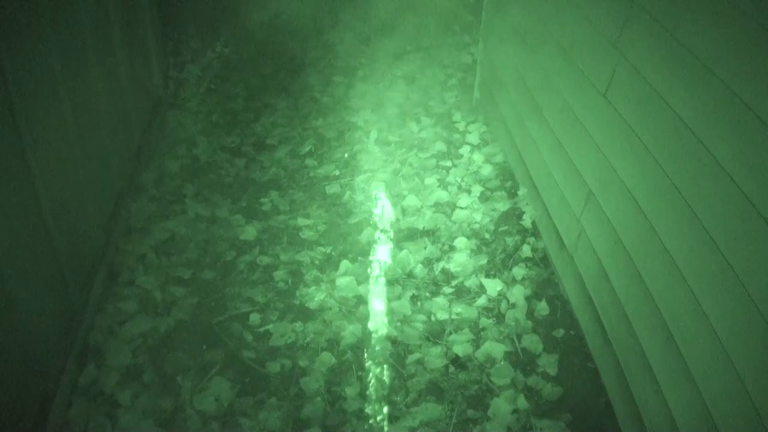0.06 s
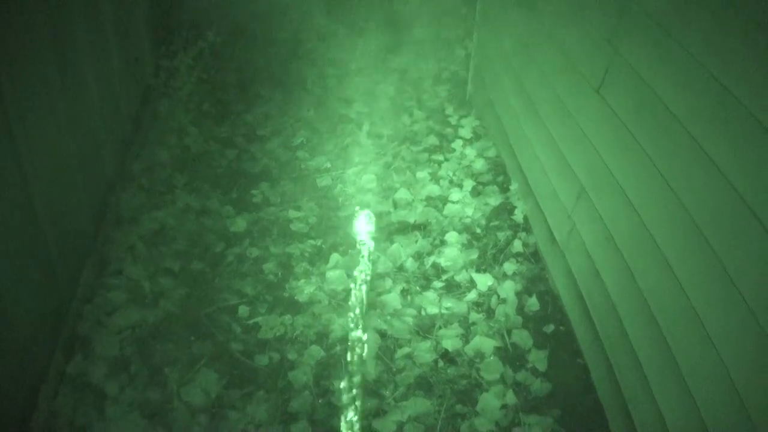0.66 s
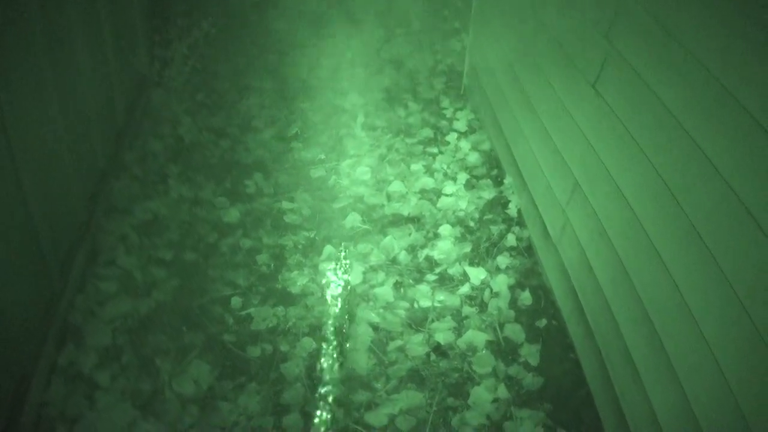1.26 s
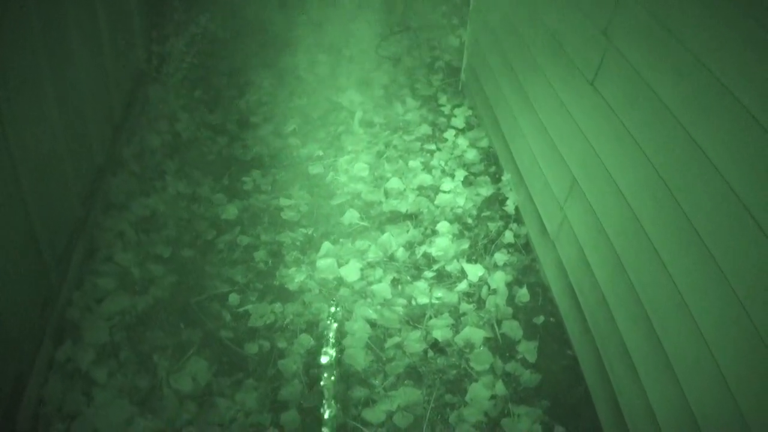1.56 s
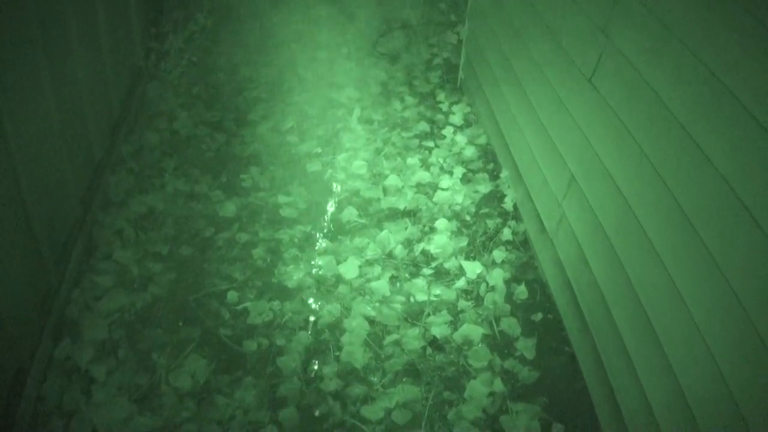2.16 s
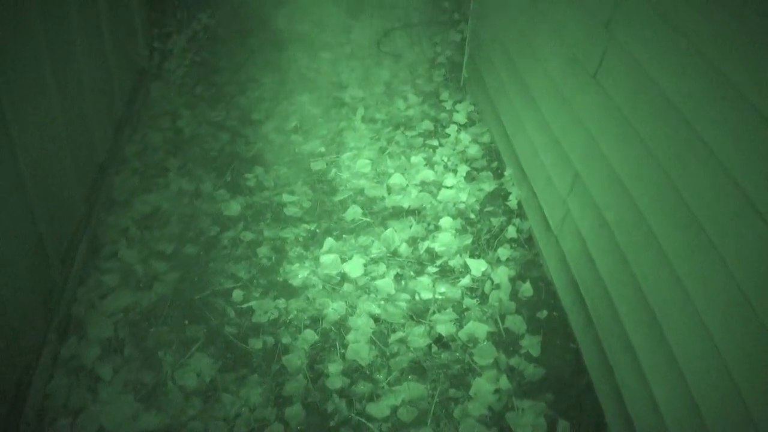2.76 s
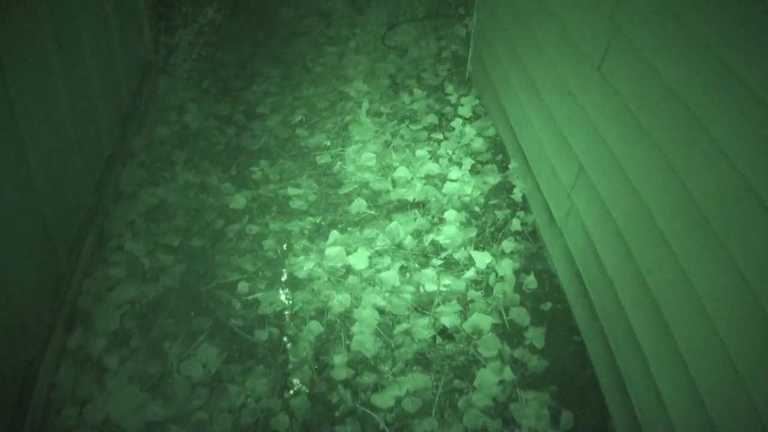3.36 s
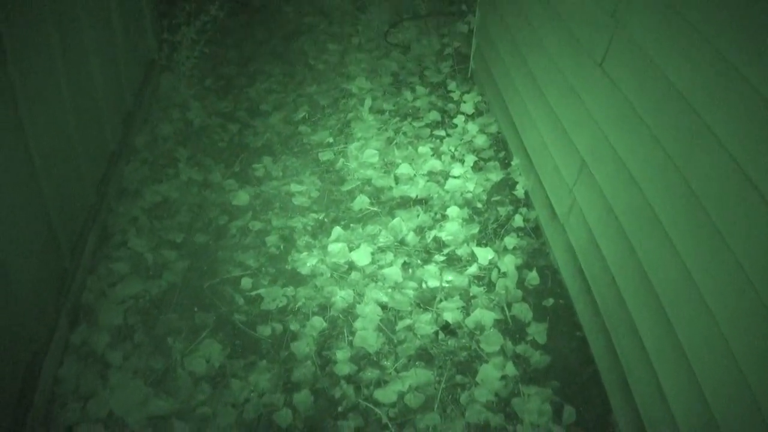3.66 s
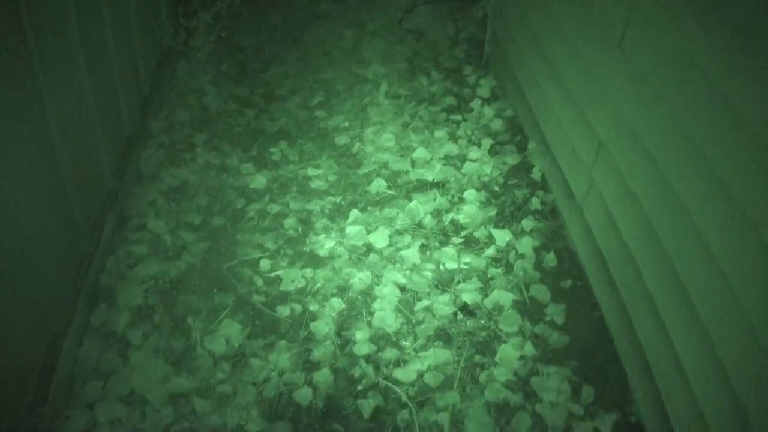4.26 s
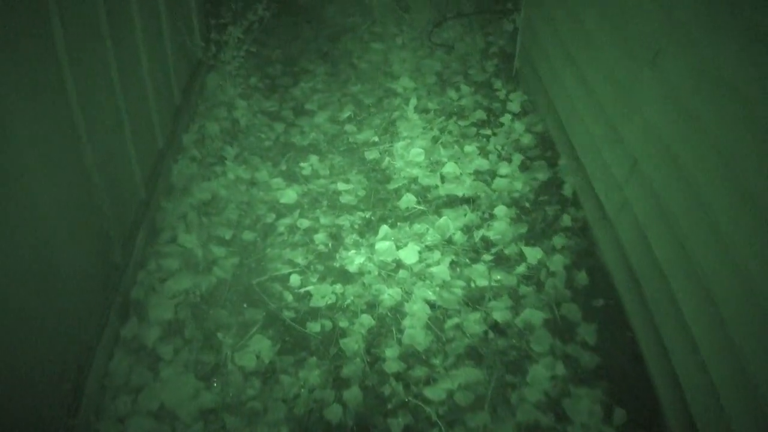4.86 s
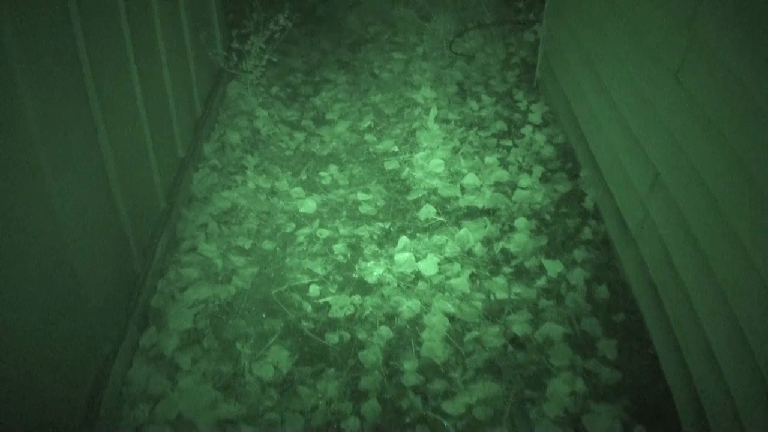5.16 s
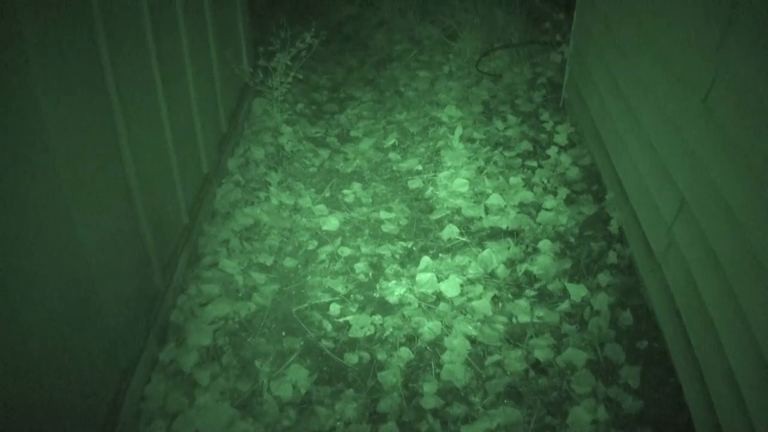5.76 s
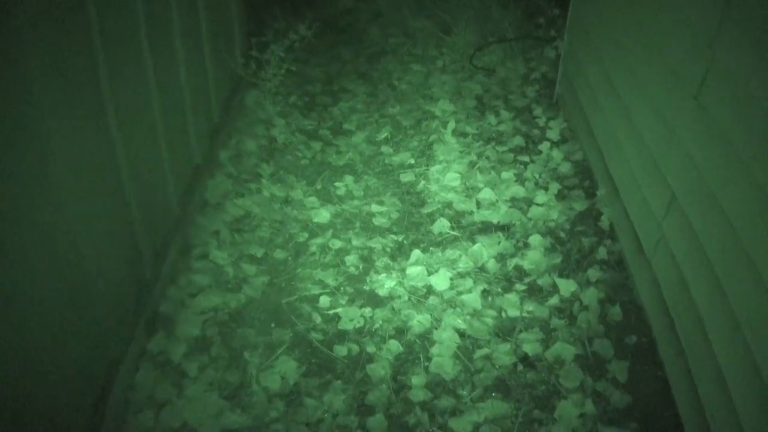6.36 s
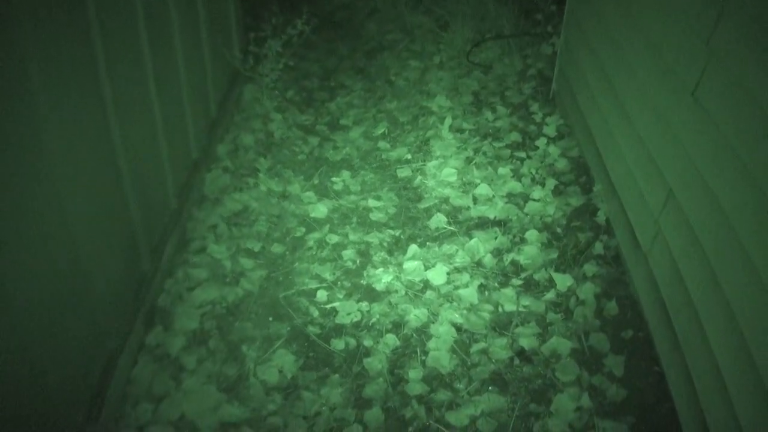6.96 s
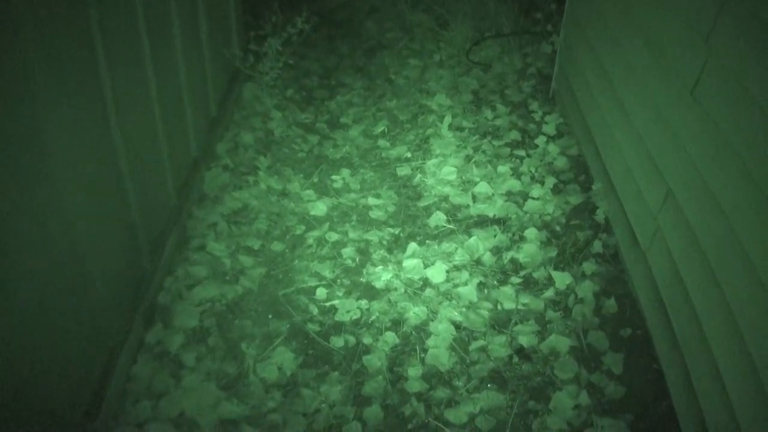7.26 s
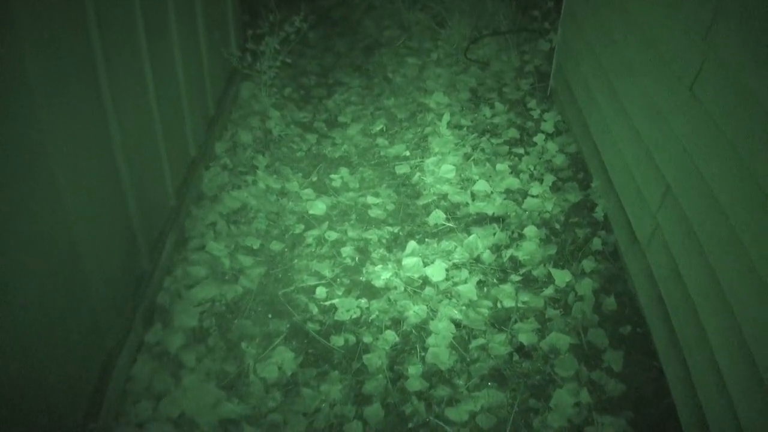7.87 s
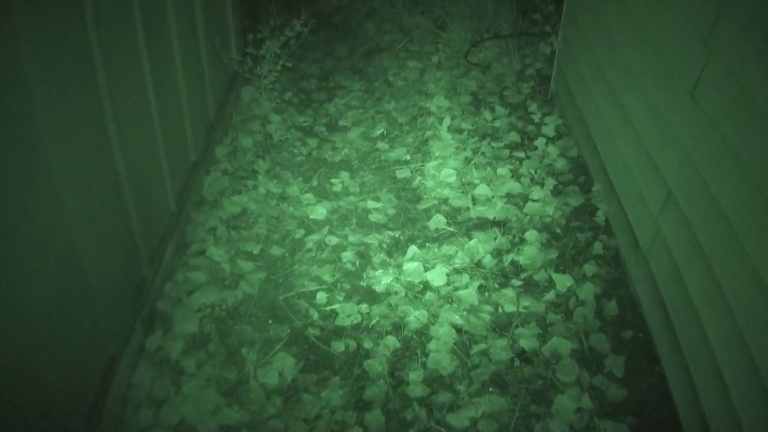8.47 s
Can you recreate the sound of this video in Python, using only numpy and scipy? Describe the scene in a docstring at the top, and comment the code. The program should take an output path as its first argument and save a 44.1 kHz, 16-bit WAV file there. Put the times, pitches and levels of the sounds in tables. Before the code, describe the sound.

Someone urinates on leaves outdoors, the splashing ending in a few drips while a camera's motor buzzes softly.

```python
"""Urine on leaves at night.

A stream patters on leaves in a narrow outdoor passage between two walls: big drops ring the leaves,
small ones merge into patter. It thins and stops; two last spurts and a few drips follow.
Throughout, a camera's tape drive buzzes into its microphone, changing colour as the camera tilts.
Behind it: hiss, a faint flickering tone and a few soft shuffles."""
import sys
import numpy as np
from scipy import signal
from scipy.fft import rfft, irfft
from scipy.io import wavfile

SR = 44100
rng = np.random.default_rng(int(sys.argv[2]) if len(sys.argv) > 2 else 0)


def master_out(mix):
    """Clip the mix to full scale and print it as 16-bit PCM to the path in sys.argv[1]."""
    frames = np.transpose(np.atleast_2d(mix))
    ceiling = np.clip(frames, -1, 1)
    pcm = np.round(ceiling * 32767).astype(np.int16)
    wavfile.write(sys.argv[1], SR, pcm)


N = 376173
TIME_S = np.arange(N) / SR

# Night air and microphone hiss: (frequency [Hz], density [dB/Hz])
HISS_SPECTRUM = [(25, -100), (55, -84), (90, -88.5), (165, -86), (250, -94), (340, -89.5), (490, -94),
                 (850, -88), (1700, -99), (3400, -100), (4000, -100.5), (4400, -105), (5200, -101.5),
                 (7500, -103), (10500, -109), (12500, -103), (15800, -114)]
# Soft low shuffles: (time [s], hold [s], level [dB])
SHUFFLE_EVENTS = [(2.865, 0.008, -50.5), (2.92, 0.093, -56), (3.55, 0.53, -62.5)]
# Shuffle colour: (frequency [Hz], relative density [dB])
SHUFFLE_SPECTRUM = [(120, -13), (220, -10), (300, 3), (400, 0), (520, -1), (750, -8), (1300, -11),
                    (2500, -26)]
# Swells of the faint tone: (time [s], hold [s], level [dB])
TONE_SWELLS = [(2.79, 0.035, -58), (2.9, 0.041, -57.5), (3.78, 0.075, -61)]
# Camera tilt: (time [s], angle index [1-3])
CAMERA_TILT = [(0, 1), (3.7, 1), (4.25, 2), (4.85, 2), (5.5, 3), (8.53, 3)]
# Tape drive, even harmonics: (frequency [Hz], relative level at angle 1, 2, 3 [dB])
EVEN_HARMONICS = [(240, -79, -85, -82), (400, -76.5, -80, -72), (720, -70, -75, -78),
                  (990, -77.5, -71, -70), (1680, -71.5, -76, -81), (2270, -81, -75, -77),
                  (2970, -84, -81, -87), (3360, -72, -78, -70.5), (3930, -74.5, -77, -79.5),
                  (4330, -82, -84, -84), (4600, -81, -73, -86), (5270, -74, -78, -72.5),
                  (5600, -69, -75, -80.5), (6300, -78, -76, -82), (6830, -74, -84, -94),
                  (7250, -74, -84, -80.5), (7500, -88, -95, -99), (9500, -105, -97, -90),
                  (10300, -89, -86, -87), (11300, -85, -99, -88), (12500, -72, -74, -71),
                  (12900, -94, -85, -84), (13700, -81, -82, -81), (15200, -95, -99, -101)]
# Tape drive, odd harmonics: (frequency [Hz], relative level at angle 1, 2, 3 [dB])
ODD_HARMONICS = [(180, -86, -91, -100), (750, -82, -85, -88), (1400, -76, -71.5, -72.5),
                 (1680, -73, -81, -81), (2460, -79, -82, -83), (2720, -74, -76, -72.5),
                 (3050, -75, -75, -79), (3500, -73, -68, -78), (3750, -78, -76, -75.5),
                 (4080, -72, -77, -72), (4340, -74, -77, -82), (4730, -77, -75, -72.5),
                 (5250, -65.5, -75, -75.5), (5750, -78, -74, -79), (6170, -64, -64, -76),
                 (6340, -71, -87, -76), (7800, -67.5, -84, -73), (8000, -71, -79, -74),
                 (8730, -73, -80, -81.5), (9400, -88, -87, -88), (10100, -77, -78, -81.5),
                 (11230, -83, -87, -86.5), (12200, -72, -67, -72), (12700, -81, -80, -87),
                 (13500, -87, -86, -82), (15200, -95, -99, -101)]
# Harmonics that ring the case: (harmonic number, relative level at angle 1, 2, 3 [dB])
CASE_HARMONICS = [(2, -61, -61, -61), (18, -61, -60, -61), (20, -64, -65, -67), (22, -65, -65, -64),
                  (24, -57, -58, -59), (26, -63, -64, -63), (32, -68, -65, -65), (34, -68, -66, -67),
                  (42, -66, -70, -67), (44, -68, -67, -68), (46, -63, -62, -62), (54, -72, -66, -65),
                  (57, -63, -64, -66), (87, -67, -59, -62), (91, -66, -64, -67), (92, -71, -69, -70),
                  (97, -76, -69, -65), (101, -62, -63, -74), (105, -68, -65, -69), (109, -72, -70, -70),
                  (115, -63, -66, -67), (117, -70, -65, -64), (121, -63, -70, -70), (123, -66, -59, -59),
                  (127, -63, -63, -61), (129, -64, -63, -72), (131, -72, -66, -70), (133, -64, -70, -71),
                  (135, -61, -74, -83), (137, -68, -66, -75), (147, -81, -73, -71)]
# Peaks and dips from ground and walls: (frequency [Hz], width [Hz], gain [dB])
PASSAGE_BANDS = [(335, 70, 9.5), (425, 65, -9), (606, 6.2, 10.5), (1580, 420, -4.5), (1966, 82, 4.5),
                 (2294, 200, 5), (2540, 90, -5.5), (2850, 130, 2.5), (3360, 33, 2), (3800, 100, -3.5),
                 (4740, 180, -10.5), (4920, 100, 6.5), (6000, 150, 0.5), (6670, 110, 1.5), (8340, 250, -3),
                 (10840, 700, -2)]
# Stream breaking up on the leaves: (time [s], relative patter level [dB], relative spray level [dB])
STREAM_LEVELS = [(0.0, -42, -47.5), (0.16, -44.5, -44.5), (0.36, -41.5, -45.5), (0.56, -43.5, -46),
                 (0.7, -39.5, -46.5), (0.83, -40.5, -46.5), (1.08, -44.5, -50.5), (1.25, -43, -44),
                 (1.47, -41, -47), (1.89, -46, -50), (2.02, -46, -54), (2.16, -55, -53),
                 (2.35, -49.5, -47.5), (2.42, -47, -43), (2.5, -47, -45.5)]
# Last spurts: (time [s], hold [s], relative level [dB])
SPURT_EVENTS = [(3.67, 0.054, -48), (3.77, .03, -53), (5.09, 0.03, -49), (5.158, 0.012, -50),
                (6.64, .08, -61)]
# Patter colour: (frequency [Hz], relative density [dB])
PATTER_SPECTRUM = [(170, -25), (330, -9.5), (620, -10), (1200, -1), (2150, -3.5), (3500, -1.5),
                   (5000, -0.5), (7000, -4.5), (10000, -2.5), (12500, -1), (15500, -22)]
# Square hits on a leaf, levels relative:
# (time [s], leaf pitch [Hz], leaf level [dB], slap level [dB], spray pitch [Hz], spray level [dB])
BIG_DROPS = [(0.0357, 4800, -37.5, -36, 12300, -37), (0.0975, 4500, -60, -55, 12000, -46),
             (0.1133, 4690, -48, -41.5, 11800, -40.0), (0.153, 2720, -25, -32, 7600, -36),
             (0.1552, 3300, -30, -42, 7600, -46), (0.2, 4220, -42, -55, 9700, -48),
             (0.209, 1160, -42, -56, 9700, -56), (0.2077, 4060, -36.5, -45, 10100, -41),
             (0.2336, 4200, -45, -53, 12000, -46), (0.264, 3320, -53, -41.5, 7500, -52),
             (0.292, 4690, -57.5, -44, 12000, -43.0), (0.3093, 3600, -31, -34, 7700, -38),
             (0.3462, 2220, -41, -39, 9800, -56), (0.354, 2100, -35, -52.0, 10500, -50.0),
             (0.3647, 4690, -38, -30.5, 7600, -35.5), (0.3998, 3250, -40.0, -43, 12000, -41),
             (0.4214, 2350, -35.5, -49, 10800, -44), (0.4462, 2300, -43, -43, 9900, -49),
             (0.4548, 2890, -40, -44, 9800, -35), (0.4724, 4420, -36, -52.5, 13500, -38),
             (0.4825, 2200, -39, -47, 9900, -39.5), (0.4954, 3570, -35, -51, 9200, -50.5),
             (0.5171, 4670, -36.5, -50, 7600, -38.5), (0.538, 3820, -34.5, -54.5, 12500, -53.5),
             (0.566, 4520, -36.5, -51, 12200, -47), (0.576, 1470, -36, -57.0, 9200, -50),
             (0.5995, 3600, -43, -52, 10500, -54), (0.611, 4480, -47, -47, 11000, -50),
             (0.6187, 4000, -44, -44, 11000, -41), (0.6275, 3900, -46, -46, 10500, -39.5),
             (0.6486, 3870, -35, -46, 12900, -51.0), (0.6689, 4170, -33, -41, 7500, -38),
             (0.6964, 3900, -40, -51, 11100, -46), (0.7032, 4650, -28.5, -36, 7600, -43),
             (0.7342, 2040, -42, -53.5, 11300, -41), (0.752, 3400, -33.5, -38, 7500, -42),
             (0.774, 4010, -42, -46.5, 9800, -41.5), (0.7844, 4220, -44, -38, 9600, -37.5),
             (0.8346, 1590, -59, -59, 10900, -35), (0.8547, 4180, -55, -45, 10900, -34),
             (0.87, 4460, -38, -41, 12600, -41), (0.9043, 3140, -40, -54, 11300, -45),
             (0.9652, 3330, -42, -51, 7500, -56), (0.9715, 1390, -40, -57, 7500, -58),
             (0.9894, 4280, -39.5, -54, 13100, -61), (1.0005, 2140, -37.5, -56, 9300, -54),
             (1.028, 2500, -46, -44, 12300, -35.5), (1.0764, 4260, -39, -45.5, 10000, -38),
             (1.0939, 3960, -36, -46, 12800, -47), (1.131, 1700, -42, -54, 11000, -54),
             (1.1453, 3190, -45, -46, 11900, -37.5), (1.1693, 2520, -46, -53.0, 12000, -36),
             (1.1806, 2900, -49, -48, 11500, -42), (1.1922, 4650, -45, -44, 12400, -35),
             (1.2375, 2520, -44, -52, 10800, -47), (1.2634, 4000, -52, -51, 11500, -49),
             (1.2879, 4340, -31.5, -41, 7800, -48.5), (1.302, 4010, -46, -50, 10900, -36.5),
             (1.3267, 3790, -54, -55, 11400, -35.5), (1.348, 4690, -36, -42, 7900, -47),
             (1.3895, 2390, -49, -42, 8700, -43), (1.4127, 1980, -45, -42, 10700, -42),
             (1.4416, 2890, -43, -53, 11500, -52), (1.4535, 2150, -43, -57, 10000, -54),
             (1.4746, 2450, -42, -53, 9200, -37.5), (1.489, 2870, -36.5, -43, 9700, -34.5),
             (1.5305, 2800, -38.5, -53, 9000, -53), (1.5382, 4690, -36.5, -48, 8900, -45),
             (1.6277, 3320, -40, -49, 13300, -44), (1.6522, 2110, -47, -56, 9900, -40),
             (1.6783, 3500, -46, -60, 10000, -60), (1.7438, 3500, -47, -50, 10000, -49),
             (1.7702, 3010, -45, -36.5, 9350, -36), (1.7996, 1210, -67, -53, 10900, -40),
             (1.815, 3700, -41.5, -59, 10700, -56.5), (1.8205, 3770, -44, -57.5, 13500, -58),
             (1.8336, 2800, -53, -43, 12000, -43), (1.8415, 3600, -44, -45, 10500, -41),
             (1.8956, 2840, -43, -59, 10100, -38.5), (1.908, 2930, -40.5, -54, 12500, -39),
             (1.918, 1850, -45, -58, 9000, -58), (1.9319, 1730, -41, -59.5, 7500, -58.5),
             (1.9537, 4290, -51, -37.5, 7500, -40), (1.9869, 2050, -46.5, -61.0, 10000, -62.0),
             (2.0168, 2860, -39, -51, 11600, -48.0), (2.0253, 4180, -46, -52, 8900, -48),
             (2.0499, 1810, -43, -62, 11600, -59), (2.0904, 2000, -50, -59, 9100, -45),
             (2.1147, 2300, -55, -54, 9000, -41), (2.133, 4460, -50, -49, 12600, -50),
             (2.1755, 3700, -49, -57, 13200, -43), (2.1951, 1680, -59, -55, 10600, -42.5),
             (2.208, 3120, -48, -61.0, 9100, -59), (2.2286, 1210, -57.5, -59, 11800, -48),
             (2.2358, 4500, -56, -57, 10500, -51), (2.2615, 4670, -54.0, -53, 9300, -41.0),
             (2.27, 4690, -47, -57, 9000, -44.5), (2.2959, 4690, -57, -53, 10200, -41.5),
             (2.3196, 2820, -44, -45, 10600, -39), (2.3524, 4160, -54.5, -47.5, 7500, -58.5),
             (2.3642, 4460, -61, -59.0, 12800, -46.0), (2.3919, 4310, -45, -45.0, 7500, -46),
             (2.4532, 3810, -45, -55.0, 10200, -49), (2.4645, 2200, -47, -56, 9500, -54),
             (2.4735, 1370, -40.5, -54, 13000, -54), (2.484, 2300, -39.5, -55, 7700, -55),
             (2.4878, 2930, -35.5, -57, 7700, -55), (2.5177, 3230, -27.5, -47, 7800, -49.5),
             (2.5215, 4400, -36, -46, 7800, -52), (2.5365, 4690, -51, -51.5, 9800, -49),
             (2.5645, 3300, -45, -51, 8400, -57), (2.5692, 2700, -43.0, -46, 8400, -53.5),
             (3.4205, 4690, -52, -56, 8300, -61.5), (3.4385, 3730, -54.0, -60.0, 8800, -64.5),
             (3.5025, 3400, -45, -52, 8200, -50), (3.5055, 2600, -46, -47, 9500, -45.5),
             (3.631, 3360, -40.5, -57, 7500, -52), (3.6646, 2970, -37, -36.5, 7500, -43),
             (3.669, 4690, -42, -44, 12500, -48), (3.686, 3210, -48, -48, 7500, -42),
             (3.7024, 3060, -37, -58, 10800, -43), (3.713, 3000, -46, -60, 11500, -51),
             (3.727, 3000, -56, -61.5, 10500, -48), (3.7642, 3380, -43.5, -55, 8200, -54),
             (3.7792, 1690, -48, -47, 7800, -53.0), (3.8329, 4500, -48, -62.0, 7500, -56.5),
             (5.0105, 1510, -58, -61, 13300, -55), (5.0858, 2970, -52, -48, 7600, -49),
             (5.11, 3830, -48, -49, 10700, -52), (5.154, 4690, -50, -52, 8100, -52),
             (5.1868, 4590, -51, -57, 8500, -59), (5.3144, 4010, -51, -58, 11800, -59),
             (5.3583, 4300, -50, -54, 8100, -59), (5.4392, 3930, -48, -52, 7900, -52),
             (6.6337, 4690, -53, -55, 7600, -49), (6.6753, 2130, -54, -60, 9400, -60),
             (6.676, 3900, -53, -62, 9400, -63), (6.7654, 2630, -53, -61, 8600, -65.0),
             (6.7835, 4050, -44, -55, 8200, -54), (7.8205, 3730, -54.5, -63.0, 13400, -69.5),
             (7.8576, 3080, -58, -60.5, 8000, -68.0), (8.015, 3230, -60, -58.5, 8200, -63.5),
             (8.221, 3940, -52, -53, 7500, -55), (8.4765, 3010, -56, -55, 7500, -60)]


def from_db(db):
    """Decibels to gain."""
    return 10 ** (np.asarray(db) / 20)


def unit_rms(x):
    """Scale to an rms of 1."""
    return x / np.sqrt(np.mean(x ** 2) + 1e-20)


def at_level(x, db):
    """Set the rms of a hit's first 10 ms."""
    return x * from_db(db) / np.sqrt(np.mean(x[:SR // 100] ** 2))


def in_time(rows):
    """Each column of a curve at every sample."""
    times_s, *columns = np.transpose(rows)
    return [np.interp(TIME_S, times_s, column) for column in columns]


def at_hz(spectrum, hz, column=1):
    """One spectrum column, interpolated over log frequency."""
    points = np.array(spectrum)
    return np.interp(np.log(np.maximum(hz, 1)), np.log(points[:, 0]), points[:, column])


def drift(rate_hz):
    """Slow random curve through unit-variance knots."""
    knots = rng.standard_normal(4096)
    return np.interp(TIME_S * rate_hz, np.arange(len(knots)), knots)


def band(x, low_hz, high_hz):
    """Causal band-pass."""
    sos = signal.butter(2, [low_hz, min(high_hz, .45 * SR)], "band", fs=SR, output="sos")
    return signal.sosfilt(sos, x + 1e-18)


def resonate(x, hz, width_hz):
    """One resonance, unity peak gain."""
    radius = np.exp(-np.pi * width_hz / SR)
    feedback = [1, -2 * radius * np.cos(2 * np.pi * hz / SR), radius ** 2]
    return signal.lfilter([1, 0, -1], feedback, x + 1e-18) * (1 - radius ** 2) / 2


def noise(spectrum):
    """Steady noise of the given density."""
    gain = from_db(at_hz(spectrum, np.arange(N + 1) * SR / (2 * N)))
    return irfft(rfft(rng.standard_normal(2 * N)) * gain)[:N] * np.sqrt(SR / 2)


def fade(power, t60_s):
    """Exponential decay of each power pulse."""
    return signal.lfilter([1], [1, -from_db(-60 / (t60_s * SR)) ** 2], power)


def swells_db(rows, attack_s, release_s):
    """Events that rise, hold and die; each ramp time spans 60 dB."""
    levels_db = []
    for start_s, hold_s, db in rows:
        ramp = np.maximum((start_s - TIME_S) / attack_s, (TIME_S - start_s - hold_s) / release_s)
        levels_db.append(db - 60 * np.maximum(ramp, 0))
    return np.max(levels_db, axis=0)


def shuffles():
    """Soft swells of low noise."""
    level_db = swells_db(SHUFFLE_EVENTS, attack_s=0.07, release_s=0.081)
    return from_db(level_db) * unit_rms(noise(SHUFFLE_SPECTRUM))


def flickering_tone(hz=842, width_hz=7.3, base_db=-71.5):
    """Narrow-band noise: a faint tone that flickers and briefly swells."""
    level_db = np.maximum(base_db, swells_db(TONE_SWELLS, attack_s=0.2, release_s=0.2))
    return from_db(level_db) * unit_rms(resonate(rng.standard_normal(N), hz, width_hz))


def tape_drive(drum_hz=60.017, scatter_db=2, buzz_trim_db=0.2, case_trim_db=0.27, count=256, size=8192):
    """The head drum ticks twice a turn, unevenly: even harmonics lead in the bass, odd ones near 7 kHz."""
    number = np.arange(1, count + 1)
    hz = number * drum_hz
    phasors = np.exp(2j * np.pi * rng.random(count))
    case_colour_db = scatter_db * rng.standard_normal(count)
    tilt = in_time(CAMERA_TILT)[0]
    turns = drum_hz * TIME_S + 0.00076 * drift(rate_hz=5.8)  # servo holds the speed almost steady
    out = np.zeros(N)
    for angle in (1, 2, 3):
        share = np.maximum(1 - np.abs(tilt - angle), 0)
        colour_db = np.where(number % 2, at_hz(ODD_HARMONICS, hz, angle), at_hz(EVEN_HARMONICS, hz, angle))
        gains = from_db(colour_db + buzz_trim_db + case_colour_db)
        gains[0] = 0  # case too small to radiate the fundamental
        for row in CASE_HARMONICS:
            gains[row[0] - 1] = from_db(row[angle] + case_trim_db)
        cycle = irfft(np.r_[0, gains * phasors], size) * size / np.sqrt(2)
        out += share * np.interp(turns % 1 * size, np.arange(size), cycle)
    return out


def passage(x):
    """Ground and wall reflections boost some pitches and cancel others."""
    for hz, width_hz, gain_db in PASSAGE_BANDS:
        x = x + (from_db(gain_db) - 1) * resonate(x, hz, width_hz)
    return x


def flow_db(stop_s=2.55, stop_db_per_s=445, spurt_spray_db=-1):
    """Patter and spray levels: the stream runs, breaks off, then spurts."""
    patter_db, spray_db = in_time(STREAM_LEVELS) - stop_db_per_s * np.maximum(TIME_S - stop_s, 0)
    spurt_db = swells_db(SPURT_EVENTS, attack_s=0.039, release_s=0.32)
    return np.maximum(patter_db, spurt_db), np.maximum(spray_db, spurt_db + spurt_spray_db)


def droplet_ticks(rate_hz=150, spread_db=1.5, splinter_db=-9, trim_db=-5):
    """Stray droplets crack on dry leaves: short, bright clicks that follow the spray."""
    sizes = from_db(spread_db * np.minimum(rng.exponential(1, N), 2.5))
    clicks = sizes * (rng.random(N) < rate_hz / SR)
    envelope = np.sqrt(fade(clicks ** 2 + 1e-18, t60_s=0.011))
    splinters = from_db(splinter_db) * envelope * rng.standard_normal(N)
    crackle = band(clicks * rng.choice([-1, 1], N) + splinters, 3800, 14400)
    _, spray_db = flow_db()
    return from_db(spray_db + trim_db) * unit_rms(crackle)


def patter(rate_hz=900, spread_db=2.5, wander_db=1.5, tail_db=-9, patter_trim_db=-3.5, spray_trim_db=0.2):
    """Small drops land at random, each a tiny burst in its leaf's own pitch range."""
    patter_db, spray_db = flow_db()
    hits = np.flatnonzero(rng.random(N) < rate_hz / SR)
    energy = from_db(spread_db * np.minimum(rng.exponential(1, N), 3))[hits] ** 2
    edges_hz = np.geomspace(150, 18000, 23)
    log_pitch = rng.uniform(np.log(edges_hz[0]), np.log(2 * edges_hz[-1]), N)[hits]
    out = np.zeros(N)
    for low_hz, high_hz in zip(edges_hz, edges_hz[1:]):
        hz = np.sqrt(low_hz * high_hz)
        pulses = np.full(N, 1e-12)
        pulses[hits] += energy * np.exp(-((log_pitch - np.log(hz)) / 0.4) ** 2)
        # fast decay, then a tail among the leaves
        power = fade(pulses, t60_s=0.0045) + from_db(tail_db) ** 2 * fade(pulses, t60_s=0.082)
        grains = band(np.sqrt(power) * rng.standard_normal(N), low_hz, high_hz)
        treble = np.clip(np.log2(hz / 4500), 0, 1)
        level_db = (1 - treble) * (patter_db + patter_trim_db) + treble * (spray_db + spray_trim_db)
        level_db += at_hz(PATTER_SPECTRUM, hz)
        level_db += wander_db * drift(rate_hz=15)  # stream wanders from leaf to leaf
        out += unit_rms(grains) * from_db(level_db) * np.sqrt((high_hz - low_hz) / 3300)
    return out


def burst(hit_t60_s, tail_db, tail_t60_s, grit_db, crack=4, size=6000):
    """A drop cracks and bursts; droplets and echoes from ground and walls trail behind."""
    time_s = np.arange(size) / SR
    envelope = from_db(-60 * time_s / hit_t60_s) + from_db(tail_db - 60 * time_s / tail_t60_s)
    grit = np.interp(time_s, np.linspace(0, time_s[-1], size // 40), rng.standard_normal(size // 40))
    sound = envelope / envelope[0] * from_db(grit_db * grit) * rng.standard_normal(size)
    sound[0] += crack
    return sound


def big_drops(heavy_db=-38, leaf_damping=0.29, sparkle_db=-8, leaf_trim_db=-1, splash_trim_db=0.5):
    """Each drop knocks a damped leaf, slaps its wet face and throws off pitched spray."""
    out = np.zeros(N + SR)
    for start_s, leaf_hz, leaf_db, slap_db, spray_hz, spray_db in BIG_DROPS:
        # heavy drops ring the whole leaf; light ones tap it, with relatively more tail
        damping = leaf_damping * from_db(-0.62 * max(leaf_db - heavy_db, 0))
        tail_db = -3 + 0.2 * max(heavy_db - leaf_db, 0)
        knock = burst(hit_t60_s=0.014, tail_db=tail_db, tail_t60_s=0.073, grit_db=2)
        leaf = band(resonate(knock, leaf_hz, leaf_hz * damping), leaf_hz / 2.7, min(2 * leaf_hz, 5200))
        slap = band(burst(hit_t60_s=0.011, tail_db=-4, tail_t60_s=0.08, grit_db=2), 4600, 6920)
        fizz = burst(hit_t60_s=0.009, tail_db=-7, tail_t60_s=0.065, grit_db=3)
        spray = band(resonate(fizz, spray_hz, width_hz=1800) + from_db(sparkle_db) * fizz, 6900, 13400)
        hit = at_level(leaf, leaf_db + leaf_trim_db)
        hit += at_level(slap, slap_db + splash_trim_db)
        hit += at_level(spray, spray_db + splash_trim_db)
        start = round(start_s * SR)
        out[start:start + len(hit)] += hit
    return out[:N]


def scene():
    """Splashing in the passage over hiss, buzz, shuffles and a faint tone; mono."""
    background = noise(HISS_SPECTRUM) + tape_drive() + shuffles()
    splashing = patter() + droplet_ticks() + big_drops()
    return (background + flickering_tone() + passage(splashing))[None]


def record(dry):
    """Steep treble cut."""
    cutoff_hz = 16300
    return signal.sosfilt(signal.ellip(10, .1, 70, cutoff_hz, fs=SR, output="sos"), dry)


dry = scene()
out = record(dry)
master_out(out)
```